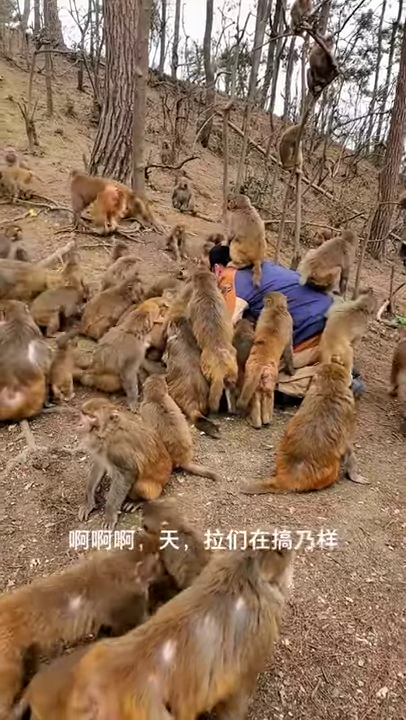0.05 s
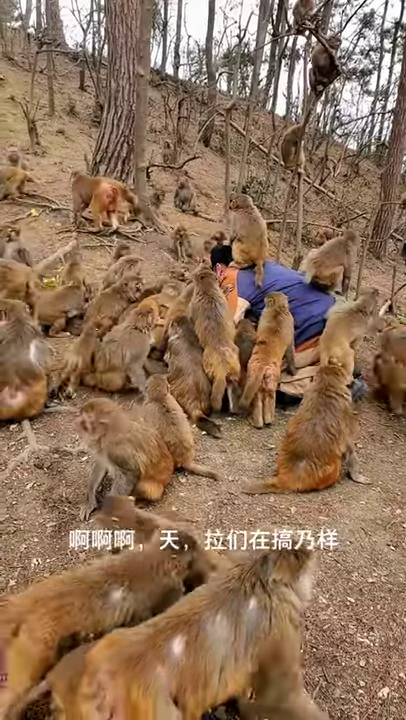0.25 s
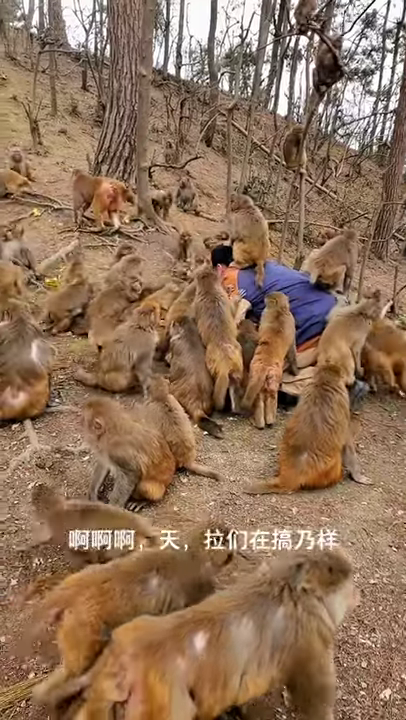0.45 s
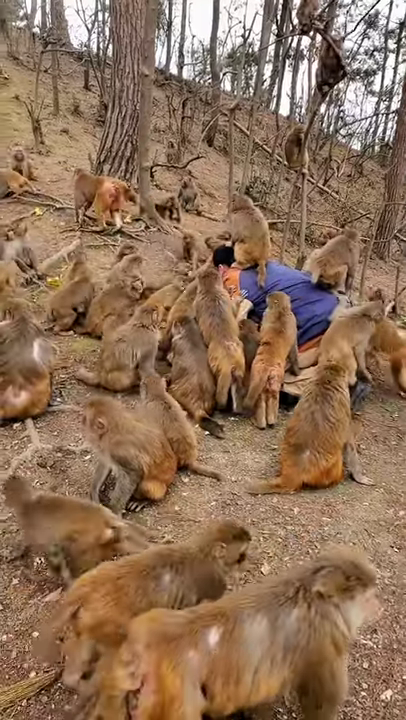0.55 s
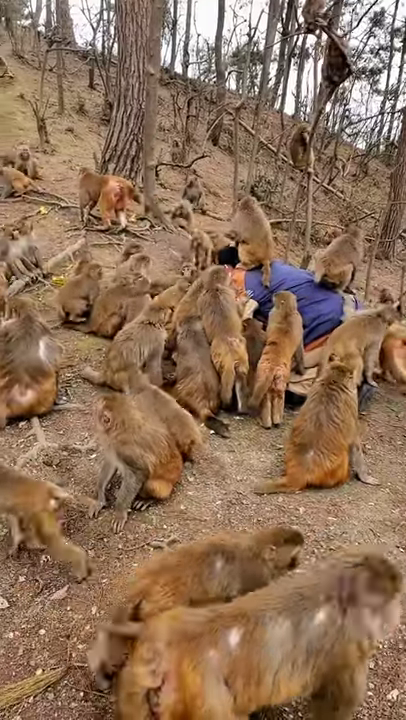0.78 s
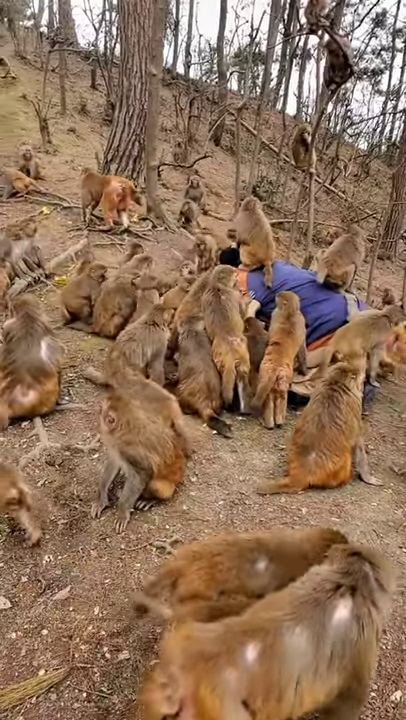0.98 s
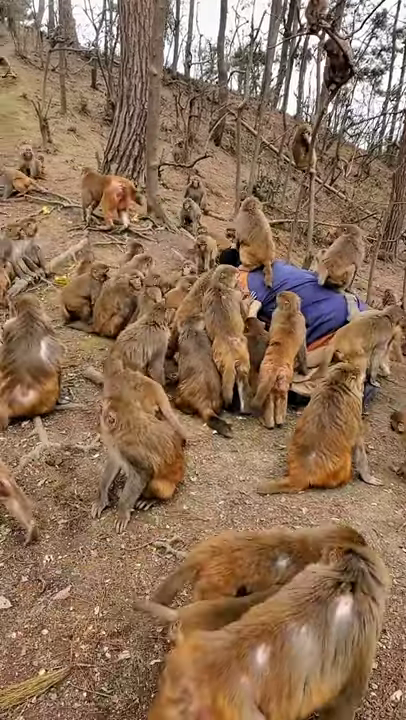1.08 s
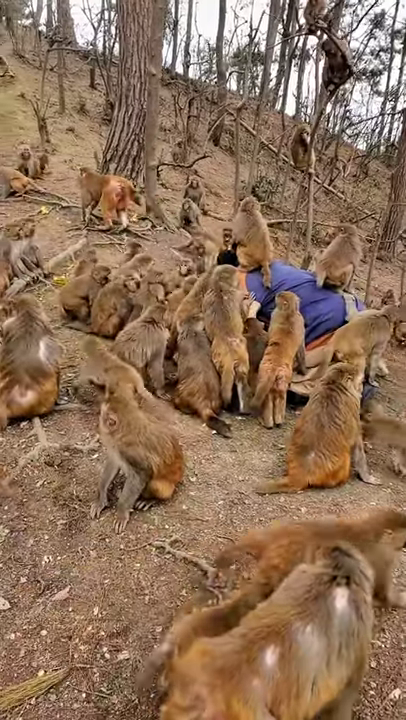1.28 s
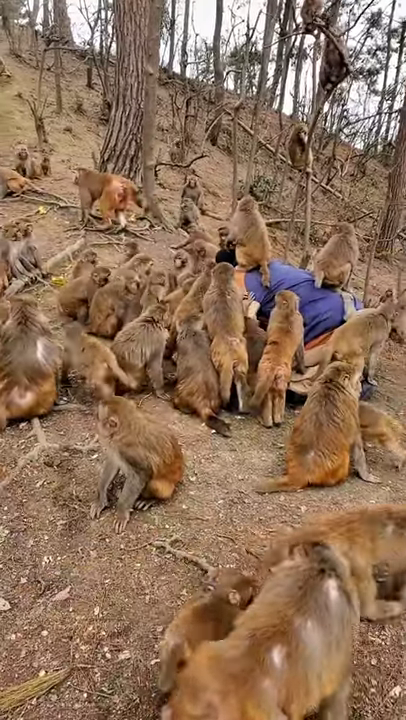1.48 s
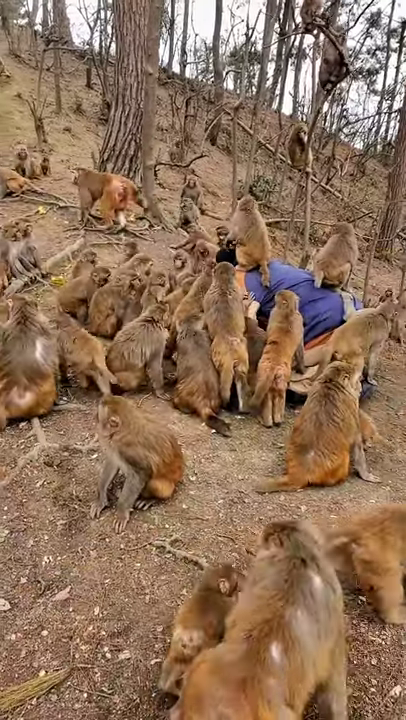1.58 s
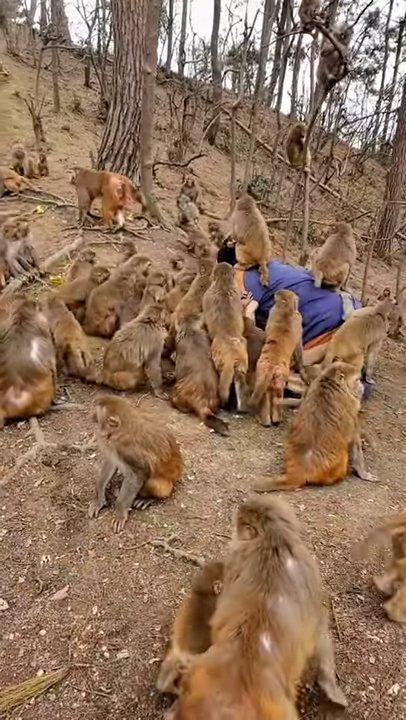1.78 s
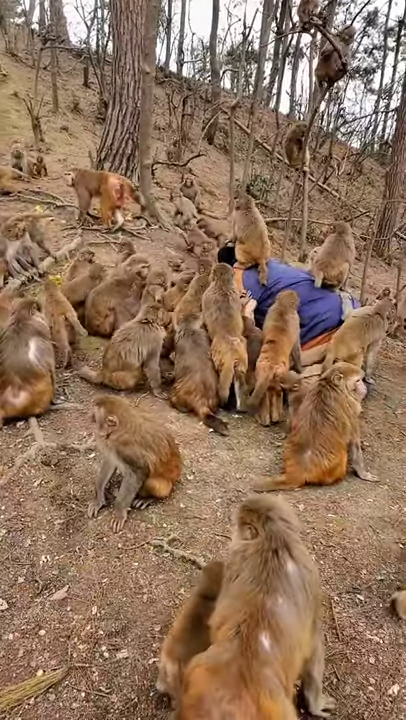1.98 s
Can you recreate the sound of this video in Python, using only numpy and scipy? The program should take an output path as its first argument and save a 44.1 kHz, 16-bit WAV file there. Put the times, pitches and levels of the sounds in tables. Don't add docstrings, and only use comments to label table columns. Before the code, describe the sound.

Monkey troop calling outdoors: loud round coos, raspy screeches, thin squeals and shrieks over rustling leaves

```python
import sys
import numpy as np
from scipy import signal
from scipy.fft import rfft, irfft, next_fast_len
from scipy.io import wavfile
from scipy.ndimage import uniform_filter1d

SR = 44100
rng = np.random.default_rng(int(sys.argv[2]) if len(sys.argv) > 2 else 0)


def to_wav(s):
    ch = np.atleast_2d(s).T
    pcm = np.round(np.clip(ch, -1, 1) * 32767)
    wavfile.write(sys.argv[1], SR, pcm.astype(np.int16))


def magnitude_from_level(level_db):
    exponent = np.asarray(level_db, float) / 20
    return 10 ** exponent


N = 90404
EDGE_HZ = 15600

# level in dB against the fundamental, from the second harmonic up.
PURE = [-36.5, -35.5]
# level in dB against the fundamental, from the second harmonic up.
RISE = [-27.5]


def evened(x):
    return x / np.sqrt(np.mean(x ** 2) + 1e-20)


def read(points, hz):
    f, value = np.transpose(points)
    return np.interp(np.log(hz + 1), np.log(f + 1), value)


def add(mix, s, sound):
    part = mix[max(round(s * SR), 0):][:len(sound)]
    part += sound[:len(part)]


def drift(n, size):
    wander = uniform_filter1d(rng.standard_normal(n), size)
    return uniform_filter1d(wander, size) * np.sqrt(size * 3 / 2)


def resonate(x, hz, width):
    turn = np.exp(2j * np.pi * np.cumsum(hz * np.ones(len(x))) / SR)
    r = np.exp(-np.pi * width / SR)
    smooth = signal.lfilter([1 - r], [1, -r], x / turn + 1e-18)
    return 2 * (turn * smooth).real


def follow(curve, size=300):
    c = np.transpose(curve)
    t = np.arange(c[0, 0], c[0, -1], 1 / SR)
    return [t] + [uniform_filter1d(np.interp(t, c[0], v), size=size, mode="nearest") for v in c[1:]]


def folds(hz, db, over_db, jitter, shimmer_db):
    n = len(hz)
    phase = 2 * np.pi * np.cumsum(hz * (1 + jitter * drift(n, size=150))) / SR
    overtones = np.zeros(n)
    for harmonic, level_db in enumerate(over_db, start=2):
        audible = hz * harmonic < SR / 2
        overtones += magnitude_from_level(level_db) * audible * np.sin(harmonic * phase)
    hold_db = 0.69 * (db.max() - db)
    fall_db = 1.5 * np.minimum(np.gradient(np.log(hz)) * SR, 0)
    tone = np.sin(phase) + magnitude_from_level(hold_db + fall_db) * overtones
    ends = signal.windows.tukey(n, min(400 / n, 1))
    return np.sqrt(2) * tone * magnitude_from_level(db + shimmer_db * drift(n, size=200)) * ends


def voices(calls):
    out = np.zeros(N)
    for curve, over_db in calls:
        length = curve[-1][0] - curve[0][0]
        t, hz, db = follow(curve, min(300, round(SR * length / 12)))
        jitter = 0.0032 * hz.mean() / 1500
        add(out, t[0], folds(hz, db, over_db, jitter, shimmer_db=0.5 * hz.mean() / 1000))
    return out


def coos():
    # time in seconds, pitch in Hz, level in dB.
    near = [(.178, 688.6, -49), (.2, 811, -31.5), (.24, 907, -19), (.265, 1005, -14.5), (.288, 1065, -11.5),
            (.32, 1105, -14.5), (.348, 1112, -16), (.375, 1069, -15.5), (.392, 1030, -27.5)]
    long_coo = [(.34, 702, -50.5), (.42, 751.6, -43.5), (.57, 871.7, -49), (.68, 798.5, -42),
                (.78, 707, -50)]
    fall = [(.505, 966, -49), (.525, 1073, -26), (.557, 1033, -14.5), (.57, 956, -20), (.59, 896, -31.5),
            (.61, 857, -26.5), (.63, 699.4, -43)]
    lingering = [(.55, 1043, -17), (.566, 1039, -19), (.59, 1023, -31.5), (.62, 975, -39)]
    rich_coo = [(.885, 912, -69), (.91, 935, -43.5), (.935, 922, -25.5), (.955, 1005, -18),
                (.975, 964.5, -31.5), (1.0, 908, -44.5)]
    hooked = [(.99, 851, -47), (1.04, 873, -46.5), (1.11, 916, -38.5), (1.137, 1006, -25.5),
              (1.17, 843, -30.5), (1.2, 613, -48.5)]
    last = [(1.99, 863, -53), (2.05, 844, -47)]
    far = [(1.185, 480, -76), (1.215, 474, -72), (1.25, 485, -78), (1.29, 505, -90)]
    # level in dB against the fundamental, from the second harmonic up.
    rich = [-20, -22, -35.5, -49]
    hook = [-18, -18]
    nasal = [-8, -18, 15, 15, 10, 14, 16, 19, 17, 10, 6]
    return voices([(near, PURE), (long_coo, PURE), (fall, PURE), (lingering, PURE),
                   (rich_coo, rich), (hooked, hook), (last, RISE), (far, nasal)])


def chirps():
    # start in
    # seconds, length in seconds, first pitch in Hz, last pitch in Hz, level in dB.
    sweeps = [(.215, .05, 2250, 2350, -41), (.225, .13, 2620, 2720, -39), (.3, .065, 3150, 3380, -43),
              (.716, 0.038, 680, 596, -48.5), (1.058, .016, 4120, 4080, -50), (1.078, .05, 4450, 4550, -53),
              (1.106, .04, 2500, 2470, -44), (1.286, .036, 1850, 2010, -50), (1.418, .035, 4740, 4850, -42),
              (1.472, .045, 5400, 5620, -41), (1.59, .12, 1100, 1130, -58), (1.737, .016, 4500, 3500, -44),
              (2.015, .035, 2200, 2430, -40)]
    # level in dB against the fundamental, from the second harmonic up.
    over_db = [-21]
    bend, top, edge_db = 0.75, 0.44, -13.5
    out = np.zeros(N)
    for s, length, from_hz, to_hz, db in sweeps:
        u = np.linspace(0, 1, round(length * SR))
        away = np.where(u < top, 1 - u / top, (u - top) / (1 - top))
        hz = from_hz + (to_hz - from_hz) * u ** bend
        add(out, s, folds(hz, db + edge_db * away ** 2, over_db, jitter=0.005, shimmer_db=2.0))
    return out


def screeches():
    # start in seconds, length in seconds, level in dB, resonance scale, upper rasp in dB.
    bursts = [(0, 0.043, -39.5, 1.58, -3), (0.016, 0.12, -38.5, 0.96, -2), (0.127, 0.096, -35, 1.017, -5),
              (0.207, 0.097, -33, 1.025, -5), (0.281, 0.13, -40.5, 0.92, -7), (0.396, 0.2, -41, 1.5, -14),
              (0.521, 0.12, -42, 0.7, -13), (0.629, 0.047, -38, 0.97, 3.5), (.655, 0.038, -36.5, .95, 1.5),
              (0.978, 0.047, -46.5, 0.64, -4), (1.091, 0.057, -41, 0.85, 0), (1.68, 0.021, -33, 0.69, 0),
              (1.718, 0.032, -33.5, 0.76, 7), (1.957, 0.054, -42, 0.85, 2.5),
              (1.992, 0.088, -42, 0.87, -1.5)]
    # frequency in Hz, width in Hz, level in dB.
    throat_bands = [(2389, 354, 7), (2750, 275, 6), (3263, 700, -0.5)]
    # frequency in Hz, width in Hz, level in dB.
    edge_bands = [(3830, 2400, -13), (5600, 2370, -20)]
    pulse_hz, rough = 479.8, 0.36
    rise, fall = 0.13, 0.54
    lowpass = signal.butter(4, 6100, fs=SR)
    out = np.zeros(N)
    for s, length, db, throat, edge_db in bursts:
        u = np.linspace(0, 1, round(length * SR))
        turns = np.cumsum(pulse_hz * throat * (1 + 0.07 * drift(len(u), size=120))) / SR
        beats = np.diff(np.floor(turns), prepend=0)
        puffs = np.exp(-(turns % 1) / 0.64) * rng.standard_normal(len(u))
        drive = (1 - rough) * evened(beats) + rough * evened(puffs)
        drive = signal.lfilter(*lowpass, np.diff(drive, n=2, prepend=[0, 0]))
        mouth = throat * (1 + 0.031 * drift(len(u), size=600))
        bands = throat_bands + [(f, w, d + edge_db) for f, w, d in edge_bands]
        sound = np.zeros(len(u))
        for k, (f, w, d) in enumerate(bands):
            sound += (-1) ** k * magnitude_from_level(d) * resonate(resonate(drive, f * mouth, w), f * mouth, w)
        shape = np.clip(np.minimum(u / rise, (1 - u) / fall), 0, 1)
        add(out, s, evened(sound) * shape * magnitude_from_level(db + 1.32 * drift(len(u), size=250)))
    return out


def shrieks():
    # time in seconds, whistle in Hz, level in dB, share broken into pulses from 0 to 1.
    first = [(0.209, 4000, -68, 0.9), (.245, 6100, -39, 0.32), (0.276, 7400, -41.5, 0.4),
             (.31, 9540, -47.5, .95), (0.354, 8800, -47, 1), (.41, 6100, -37.5, 0.9)]
    second = [(.385, 4490, -37.5, 1), (0.438, 6230, -40, 0.51), (.5, 6857, -40.5, 0.56),
              (.54, 5230, -38, 0.32), (0.582, 4100, -40, .2), (.61, 3980, -35.5, .2)]
    third = [(1.372, 3720, -45, 1), (1.42, 4750, -46.5, 0.32), (1.455, 5174, -43, 0.83),
             (1.5, 5600, -38.5, 0.45), (1.52, 5420, -44.5, 0.39), (1.542, 6890, -42.5, 0.98),
             (1.562, 6100, -41.5, 0.48), (1.58, 4746, -39, 0.041), (1.606, 5060, -33.5, 0.18)]
    pulse_rates = [700, 620, 520]
    widths = [2000, 3200, 900]
    rasps = [.16, .11, .035]
    overs = [
        [-40, -31],
        [-30, -31],
        [-33, -34],
    ]
    out = np.zeros(N)
    curves = [first, second, third]
    for curve, pulse_hz, width, hiss, over_db in zip(curves, pulse_rates, widths, rasps, overs):
        t, hz, db, broken = follow(curve)
        n = len(t)
        broken = np.clip(broken, 0, 1)
        turns = np.cumsum(pulse_hz * (1 + 0.028 * drift(n, size=600))) / SR
        harmonics = np.arange(1, int(EDGE_HZ / pulse_hz))
        beats = np.cos(2 * np.pi * np.outer(harmonics, turns)).sum(0)
        drive = evened(beats) + 0.45 * rng.standard_normal(n)
        ringing = resonate(drive, hz * (1 + 0.1 * drift(n, size=300)), width)
        ringing = resonate(ringing, hz, width * 2)
        rung = evened(ringing + hiss * np.diff(drive, prepend=0))
        rung = rung * magnitude_from_level(db + 1.1 * drift(n, size=250)) * signal.windows.tukey(n, 0.15)
        whistle = folds(hz, db, over_db, jitter=0.0118, shimmer_db=3.0)
        add(out, t[0], (1 - broken) * whistle + np.sqrt(broken) * rung)
    return out


def squeals():
    # time in seconds, pitch in Hz, level in dB.
    middle = [(1.607, 4444, -38.5), (1.65, 4774, -40.5), (1.68, 5223, -39), (1.715, 5260, -47),
              (1.745, 5010, -35), (1.76, 4490, -39), (1.77, 3050, -36)]
    upper = [(1.677, 6150, -34), (1.69, 5800, -43.5), (1.705, 6250, -39.5), (1.725, 5310, -43)]
    lower = [(1.557, 4140, -45), (1.578, 3155, -44), (1.61, 3316, -58)]
    yelp = [(1.735, 2360, -32), (1.74, 2166, -21.5), (1.745, 2090, -33.5), (1.75, 1900, -34),
            (1.762, 1620, -36)]
    # level in dB against the fundamental, from the second harmonic up.
    shrill = [-23.5, -26]
    return voices([(middle, shrill), (upper, PURE), (lower, PURE), (yelp, PURE)])


def cries():
    # time in seconds, pitch in Hz, level in dB.
    rising = [(1.284, 600, -39.5), (1.32, 663, -42.5), (1.352, 704, -32), (1.4, 812.4, -41),
              (1.47, 866.5, -42.5)]
    under = [(1.286, 535, -47.5), (1.33, 620, -48), (1.36, 640, -50), (1.4, 728, -43.5)]
    climb = [(.955, 1906, -51), (.972, 2060, -32), (.98, 2125, -46), (.992, 2203, -28.5),
             (1.002, 2253, -42.5), (1.014, 2345, -34), (1.028, 2570, -42), (1.04, 2710, -59)]
    short_cry = [(.588, 2297, -48), (.6, 2600, -38), (.61, 2740, -34), (.625, 2730, -44)]
    last = [(1.89, 1877, -46), (1.905, 1983, -36), (1.928, 2317, -27), (1.945, 2480, -36),
            (1.972, 2740, -38), (1.985, 2820, -46)]
    # level in dB against the fundamental, from the second harmonic up.
    cry_over = [-29, -40]
    return voices([(rising, RISE), (under, PURE), (climb, cry_over), (short_cry, cry_over),
                   (last, cry_over)])


def woods(x):
    # frequency in Hz, time to fall by 60 dB in seconds.
    decay = [(900, 0.62), (6000, 0.41)]
    # frequency in Hz, level in dB.
    scatter_db = [(1000, -21), (3000, -5.5)]
    # delay in seconds, level in dB.
    echoes = [
        (0.031, -18.5),
    ]
    taps = np.zeros((2, SR // 2))
    slots = np.arange(100, SR // 2 - 20, 20)
    at = slots + rng.integers(0, 20, (2, len(slots)))
    np.put_along_axis(taps, at, rng.choice([-1., 1.], at.shape), 1)
    hz, t, z = signal.stft(taps, SR, nperseg=256)
    z = z * magnitude_from_level(-60 * t / read(decay, hz)[:, None])
    z = z / np.sqrt((abs(z) ** 2).sum(2).mean()) * magnitude_from_level(read(scatter_db, hz))[:, None]
    tail = signal.istft(z, SR, nperseg=256)[1] / 128
    tail[0, 0] = 1
    shaded = np.exp(-2 * np.pi * 2520 * np.arange(64) / SR)
    tail[1, :len(shaded)] += shaded / shaded.sum()
    for s, db in echoes:
        tail[:, round(s * SR)] += magnitude_from_level(db)
    return signal.fftconvolve(x[None], tail, axes=1)[:, :N]


def wash(colour, patchy_db):
    # frequency in Hz, coherence from 0 to 1.
    likeness = [(60, 0.81), (300, 0.78), (940, 0.45), (3700, 0.039)]
    frames, hz = N // 256 + 5, np.fft.rfftfreq(1024, 1 / SR)
    a, b, c, d, patches = rng.standard_normal((frames, 513, 5)).T
    patches = uniform_filter1d(patches, size=12, axis=0)
    patches = evened(uniform_filter1d(patches, size=10, axis=1))
    same = np.clip(read(likeness, hz), -1, 1)[:, None]
    left, other = a + 1j * b, c + 1j * d
    right = same * left + np.sqrt(1 - same ** 2) * other
    z = np.array([left, right]) * magnitude_from_level(read(colour, hz)[:, None] + patchy_db * patches)
    return evened(signal.istft(z, nperseg=1024, noverlap=768)[1][:, :N])


def litter():
    # time in seconds, level in dB.
    steps = [
        (0, -40.5),
        (0.119, -47.5),
        (.3, -39.5),
        (.6, -53.5),
        (1.06, -75),
        (1.13, -53),
        (1.25, -67),
        (1.5, -56),
        (1.78, -50.5),
        (1.88, -54),
    ]
    # frequency in Hz, level in dB.
    leaf_colour = [(500, -7.5), (3000, 0.5), (6500, 1), (8000, -10), (15000, -12.5)]
    stir = magnitude_from_level(np.interp(np.arange(N) / SR, *np.transpose(steps)) + 1.7 * drift(N, size=300))
    return stir * wash(leaf_colour, patchy_db=-1.0)


def rumble():
    # frequency in Hz, width in Hz, level in dB.
    tones = [(66.6, 41, 0), (101.9, 134, -7)]
    # time in seconds, level in dB.
    swells = [(0, -58), (.02, -40), (.24, -37.5), (0.288, -47), (.61, -40.5), (.77, -49), (.91, -41),
              (0.951, -49), (1.12, -42), (1.29, -49), (1.7, -44), (1.72, -40.5), (1.9, -42.5),
              (2.01, -44.5), (2.04, -33.5)]
    noise = rng.standard_normal(N)
    low = evened(sum(magnitude_from_level(d) * evened(resonate(resonate(noise, f, w), f, w)) for f, w, d in tones))
    return low * magnitude_from_level(np.interp(np.arange(N) / SR, *np.transpose(swells)))


def air():
    # frequency in Hz, level in dB per Hz.
    air_colour = [(25, -47), (55, -5), (100, -14), (450, -17), (1500, -22.5), (4000, -22), (7500, -36.5),
                  (15000, -38)]
    return magnitude_from_level(-50.5) * wash(air_colour, patchy_db=-3.5)


def scene():
    lean = np.array([[1], [-1]])
    middle = woods(coos() + chirps() + screeches())
    left_group = magnitude_from_level(2 * lean) * woods(shrieks() + squeals())
    return middle + left_group + woods(cries()) + rumble() + air() + litter()


def top_cut(x):
    return signal.sosfilt(signal.butter(12, 15590, fs=SR, output="sos"), x)


def record(dry):
    # frequency in Hz, left over right in dB.
    port_db = [(60, 0), (400, -2), (900, 6.5), (2300, 3), (6500, 4.5), (8300, 11), (10500, 8.5)]
    n = next_fast_len(N + 2048)
    hz = np.fft.rfftfreq(n, 1 / SR)
    shade = magnitude_from_level(-read(port_db, hz))
    ports = np.array([2 / (1 + abs(shade)), 2 * shade / (1 + abs(shade))])
    mix = irfft(rfft(dry, n) * ports * (hz < EDGE_HZ), n)[:, :N]
    return top_cut(mix)


dry = scene()
out = record(dry)
to_wav(out)
```